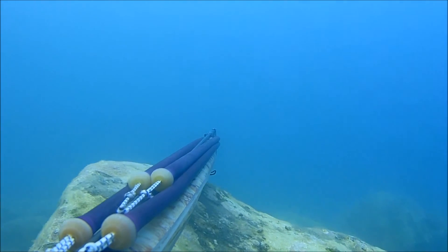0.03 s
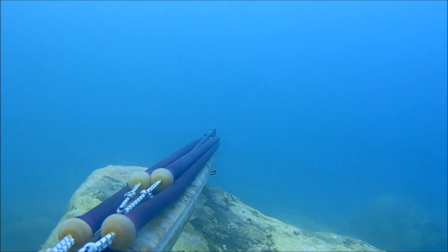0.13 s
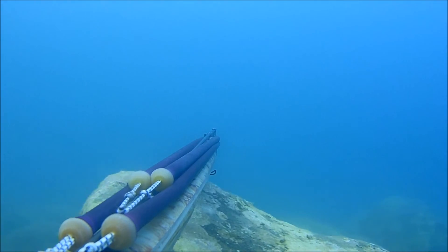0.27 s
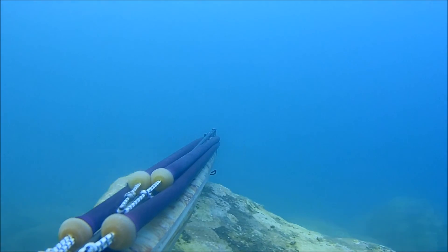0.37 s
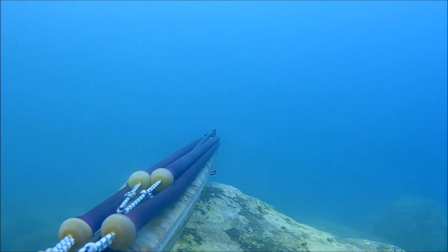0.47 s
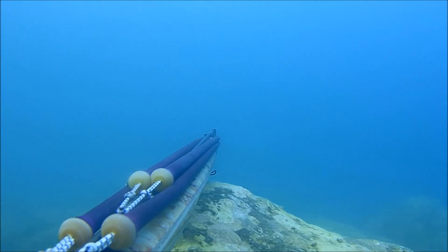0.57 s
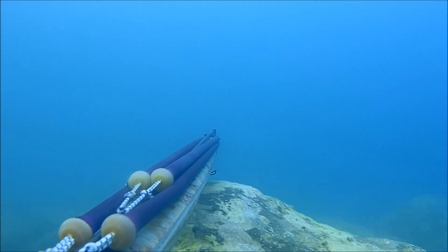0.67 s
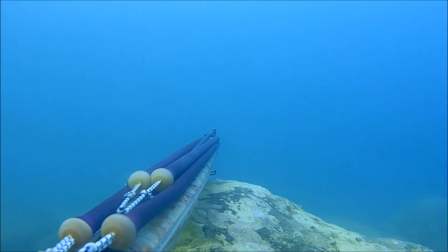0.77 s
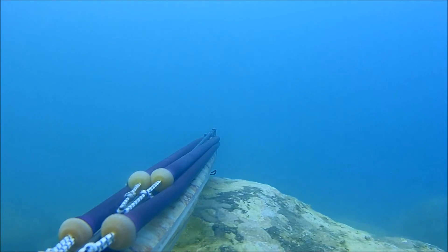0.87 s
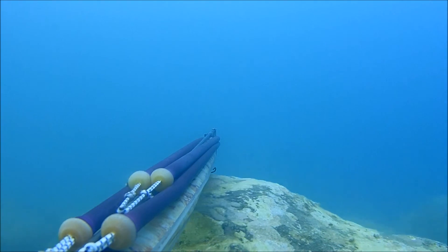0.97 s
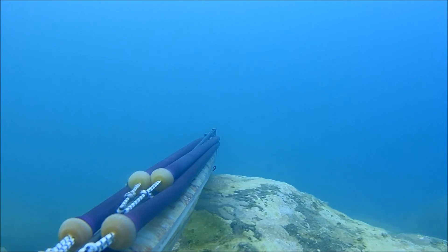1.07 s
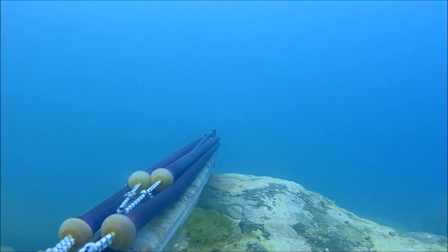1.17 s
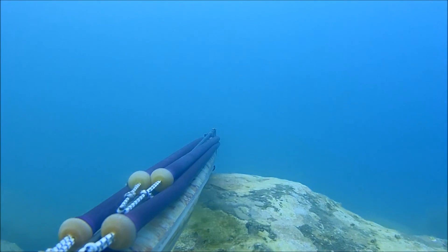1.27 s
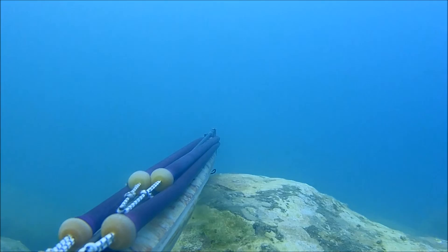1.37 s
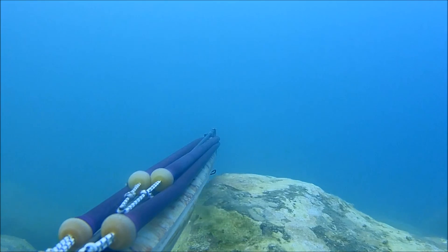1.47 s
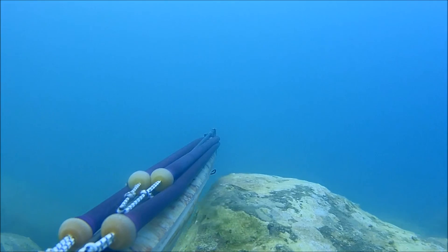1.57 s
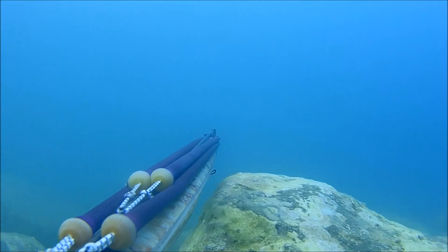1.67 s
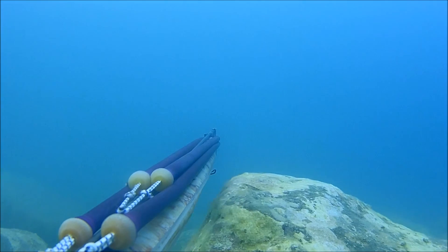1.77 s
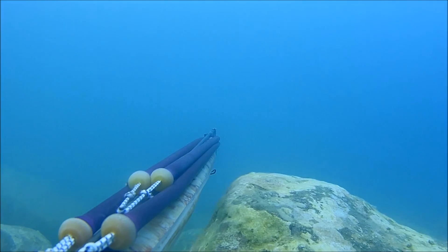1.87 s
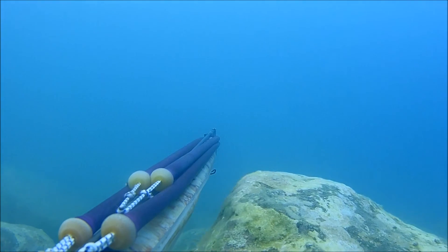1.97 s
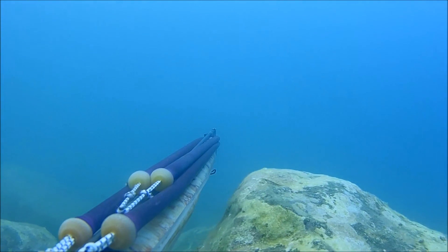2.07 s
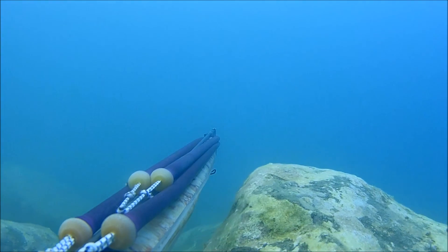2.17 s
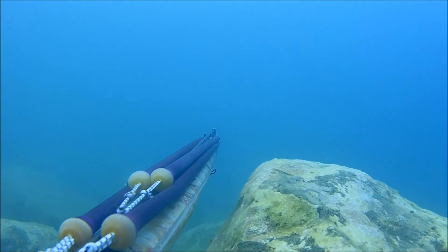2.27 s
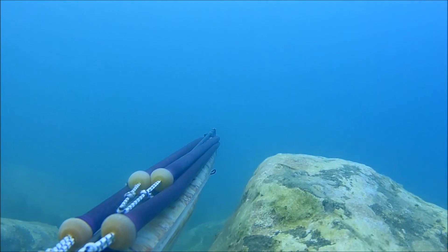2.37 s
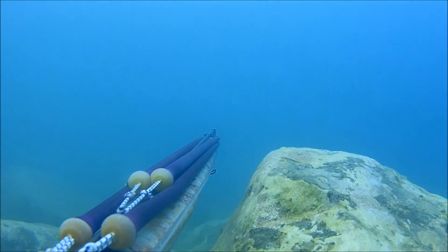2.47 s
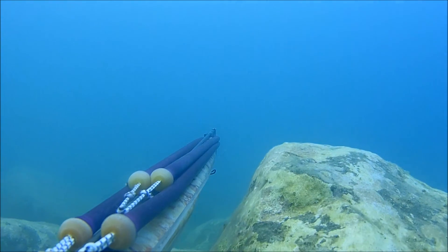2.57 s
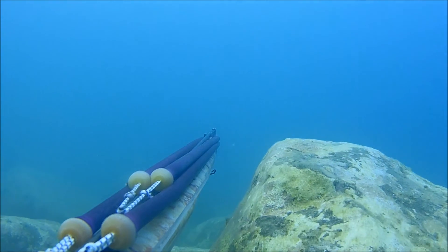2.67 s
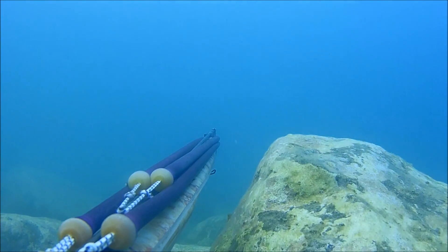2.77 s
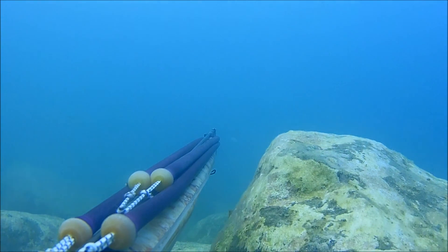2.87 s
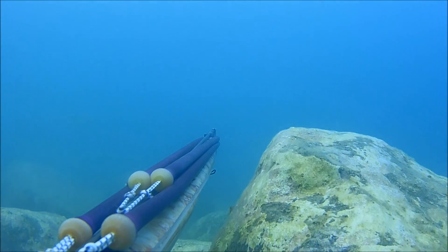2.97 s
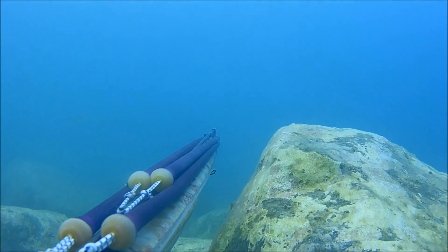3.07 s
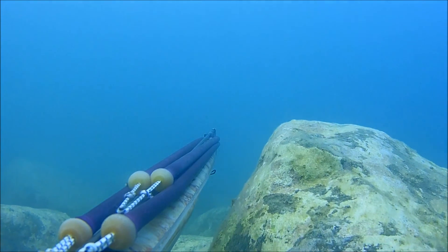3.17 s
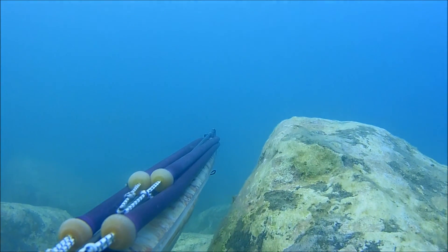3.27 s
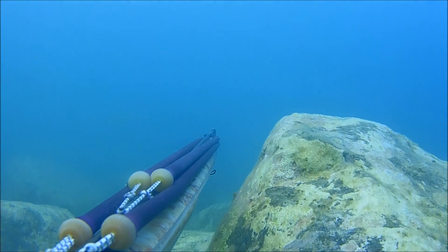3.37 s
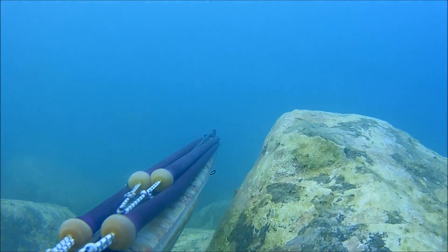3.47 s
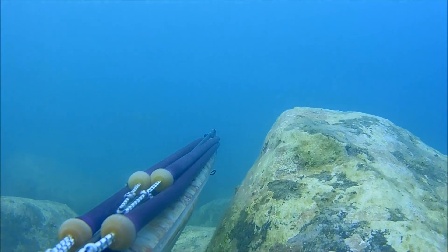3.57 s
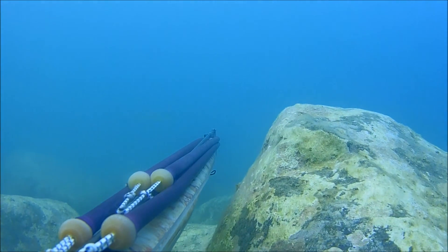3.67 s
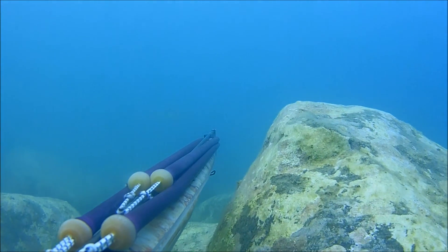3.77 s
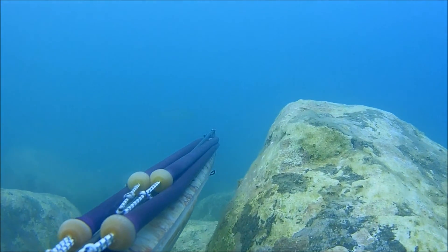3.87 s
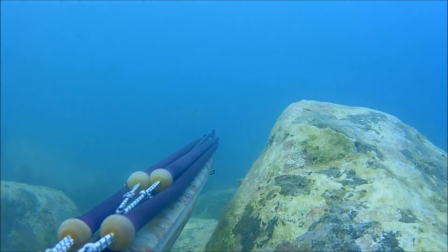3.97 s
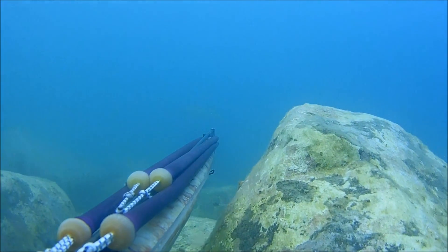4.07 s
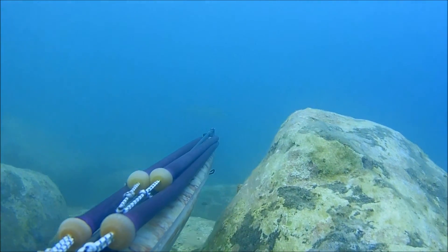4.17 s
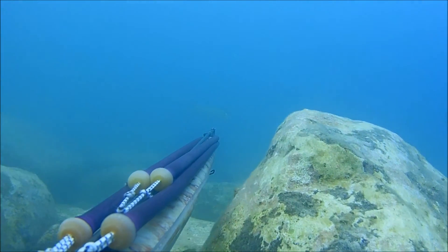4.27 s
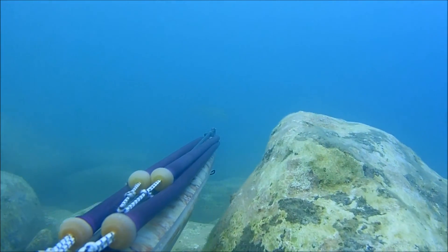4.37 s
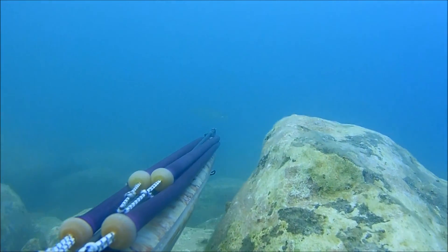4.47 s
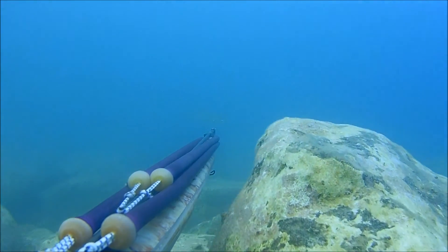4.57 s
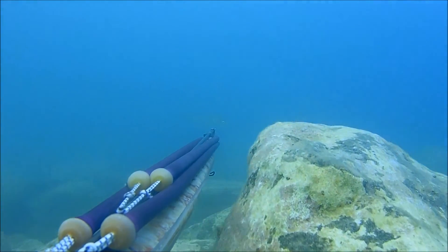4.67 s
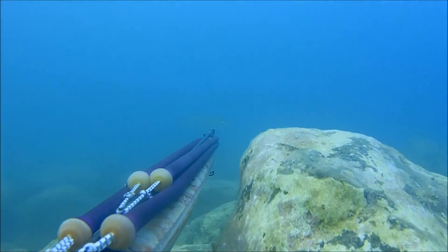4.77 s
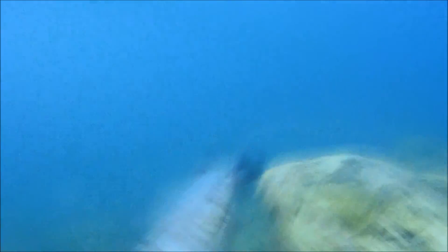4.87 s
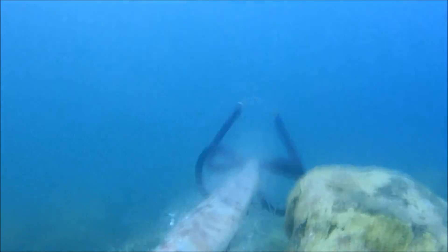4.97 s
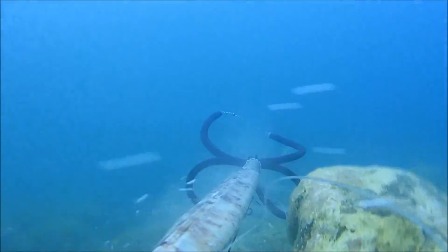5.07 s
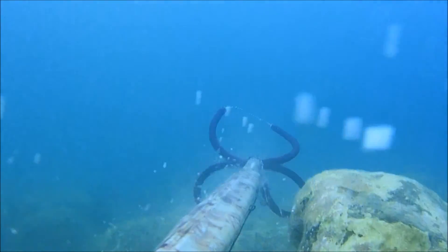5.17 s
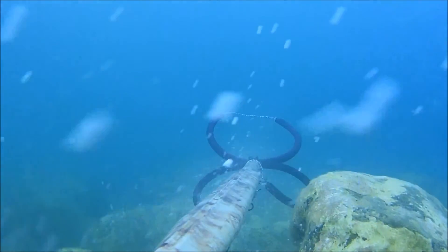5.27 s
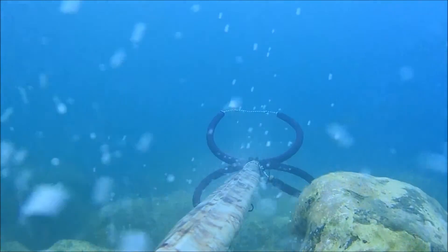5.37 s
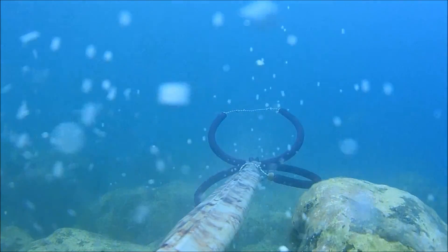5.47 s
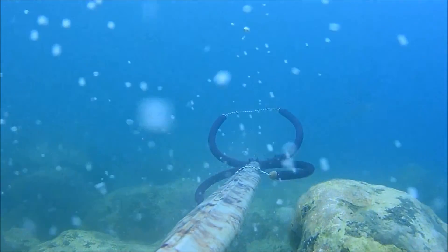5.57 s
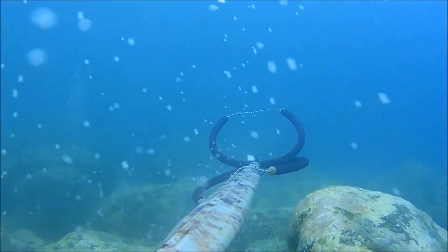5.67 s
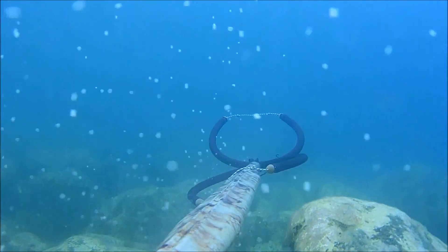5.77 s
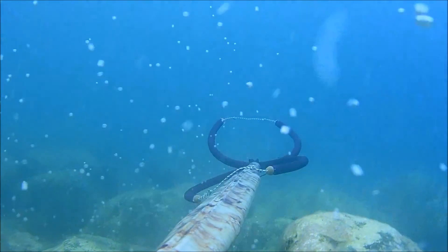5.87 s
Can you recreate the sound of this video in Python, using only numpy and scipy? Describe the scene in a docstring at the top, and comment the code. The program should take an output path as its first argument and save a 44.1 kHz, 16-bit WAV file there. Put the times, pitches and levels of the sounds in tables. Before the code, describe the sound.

The microphone is sealed in a housing on a speargun underwater, so handling sounds close, dull and hollow. For the first 3.5 seconds there is only a very faint, low-weighted hiss, tiny dry shrimp snaps with short rocky echoes, and a few barely audible taps. From about 3.6 seconds, soft rubbing and low rocking creep in; knocks strengthen after 4.4, with a firm woody double knock near 4.63 and low rumbling just before the shot. At 4.92-4.93 the gun fires: a very loud, overdriven battering of overlapping slams, bright at first, with deep recoil thumps, lasting until about 5.1. Strong slaps follow at 5.15 and 5.2, with a low swinging thud around 5.22-5.27. Bands, shaft and line then knock and rattle irregularly on the barrel at 5.4-5.65, with jerky wet rubbing and a sharper shrimp snap near 5.53. By 5.8 it thins to faint movement and hiss.

```python
"""Under water, a band-powered speargun is knocked and rubbed, then fires with a battering, overdriven burst.
Bands, shaft and line slap the barrel afterwards, over far shrimp crackle and a faint hiss.
The microphone sits in a housing fixed to the gun. Knocks and snaps are sums of fading sine waves;
the shot and the rubbing are noise ringing the same gun modes, with slow swings for recoil and sway."""
import sys
import numpy as np
from scipy import signal
from scipy.fft import rfft, irfft, next_fast_len
from scipy.io import wavfile
from scipy.ndimage import map_coordinates

SR = 44100
rng = np.random.default_rng(int(sys.argv[2]) if len(sys.argv) > 2 else 0)


def store_wav(level_fs):
    """Save 16-bit WAV to argv[1]."""
    pcm = np.round(np.clip(np.atleast_2d(level_fs), -1, 1) * 32767)
    wavfile.write(sys.argv[1], SR, pcm.T.astype(np.int16))


N = 261513  # length in samples

# Ways the gun rings. The damping in ring() later scales the fading.
# Columns: [f/Hz, level/dB, time to fade by 60 dB at damping 1/s]
STOCK_LOW_MODES = [(513, -3, 0.026), (629, -4.5, 0.043), (694.4, 0.5, 0.051), (816, -5, 0.03)]  # stock and housing
STOCK_HIGH_MODES = [(1042, -10.5, 0.031), (1429, -2.5, 0.03), (1621, 0, 0.016), (1768, -14.5, 0.027),
                    (2330, -21, 0.024), (3400, -22, 0.0089)]
STOCK_THUD_MODES = [(237, -8, 0.057), (386, 5, 0.029), (448, 1.5, 0.051)]
SHUDDER_HZ = 109.7


def amp(db):
    """Turn decibels into a plain multiplier."""
    return 10 ** (np.asarray(db) / 20)


def unit(x):
    """Scale a sound to an rms (average strength) of 1."""
    return x / np.sqrt(np.mean(x ** 2) + 1e-20)


def filtered(x, response):
    """Multiply the spectrum of x by a response that depends on frequency."""
    m = next_fast_len(N + SR // 2)  # spare room at the end
    spectrum = rfft(x, m) * response(np.fft.rfftfreq(m, 1 / SR))
    return irfft(spectrum, m)[:N]


def wobble(rate, size=N):
    """A smooth curve through random points, rate points a second."""
    points = rng.standard_normal(int(size * rate / SR) + 4)
    return map_coordinates(points, [np.arange(size) * rate / SR])


def ring(modes, scatter, attack, damping=0.86):
    """A struck body: a tenth of a second of fading sines, one row a mode; scatter in dB, attack in s."""
    t = np.arange(SR // 10) / SR
    hz, db, t60 = np.transpose(modes)[:, :, None]
    # each ring gets slightly random mode pitches and levels
    hz = hz * (1 + 0.0094 * scatter * rng.standard_normal(hz.shape))
    level = db + scatter * rng.standard_normal(db.shape)
    fading = amp(level - 60 * damping * t / t60)
    onset = (1 - np.exp(-t / attack)) ** 2
    return fading * np.sin(2 * np.pi * hz * t) * onset


def add(track, s, sound):
    """Mix a sound into the track at s seconds."""
    start = round(s * SR)
    track[start:start + len(sound)] += sound[:len(track) - start]


def shaken(modes, size=N):
    """Steady noise keeps the modes ringing, at rms 1."""
    noise = rng.standard_normal(size + SR // 10 - 1)
    return unit(signal.fftconvolve(noise, ring(modes, 0, 1e-4).sum(0), "valid"))


def held(length, t60):
    """An envelope that rises in 0.7 ms, holds until length seconds, then fades by 60 dB in t60 seconds."""
    t = np.arange(round(length * SR) + SR // 20) / SR
    return np.minimum(t / .0007, 1) * amp(-60 * np.maximum(t - length, 0) / t60)


def shot():
    """Shaft and bands batter the barrel; the strongest slams throw the gun back and it swings forward again."""
    # Slams: [t/s, length/s, low clatter level/dB, high clatter starting level/dB, recoil level/dB]
    # a recoil level near -30 dB means practically none: such a slam only clatters
    slams = [(4.918, 0.0068, -22, -43, -30), (4.932, 0.015, -1, 8, 5.5), (4.955, 0.0081, -39, -29, -30.5),
             (4.963, 0.029, -2.5, -1, 8.5), (4.972, .021, 4, -0.5, -32), (4.9936, .021, -4, -2.5, 9),
             (4.999, .009, 4.5, -6.5, -31.5), (5.02, .027, 2.5, -10, -7), (5.049, 0.026, -6.5, 0.5, -11),
             (5.062, 0.0029, -6, -5.5, -31.5), (5.078, 0.03, -21, -18.5, -12.5),
             (5.079, 0.013, -10.5, -20.5, -31), (5.113, 0.0044, -3.5, 2, -28),
             (5.204, 0.014, -7.5, -10, -28.5)]
    back_s, forward_share = .009, 0.8  # length of the backward push in s; forward strength beside it
    bright_fade_db = 11  # the high clatter loses this much over the slam's length
    low, high, shove = np.zeros((3, N))
    for s, length, low_db, high_db, recoil_db in slams:
        add(low, s, amp(low_db) * held(length, 0.014))
        bright = held(length, 0.015)
        fade_db = bright_fade_db * np.arange(len(bright)) / SR / length
        add(high, s, amp(high_db - fade_db) * bright)
        recoil = amp(recoil_db)
        add(shove, s, -recoil * held(back_s, .007))
        add(shove, s + back_s, forward_share * recoil * held(max(length - back_s, 0), .007))
    # a broad scrape, strongest near 1800 Hz
    scrape = unit(filtered(rng.standard_normal(N), lambda hz: hz / (1 + (hz / 1800) ** 2)))
    shudder = shaken([(SHUDDER_HZ, 0, .09)])
    low_clatter = shaken(STOCK_LOW_MODES) + 0.28 * shaken(STOCK_THUD_MODES) + 0.39 * shudder
    high_clatter = shaken(STOCK_HIGH_MODES) + 0.095 * scrape
    return low * low_clatter + high * high_clatter + shove


def knocks():
    """Each blow has its own favoured low mode and brightness; harder or lower blows thud more."""
    # Blows: [t/s, peak level of the low modes/dB, favoured f/Hz, upper part against the low modes/dB]
    # where a blow lands decides its favoured mode and brightness
    blows = [(1.263, -43.5, 875, 2.5), (2.026, -47, 710, 12), (2.883, -44.5, 697, -14),
             (3.527, -39, 692, -17), (3.969, -30.5, 824, -14), (4.223, -40.5, 810, 2),
             (4.291, -38.5, 684, -20), (4.319, -41, 700, -8), (4.479, -24, 580, -16), (4.6, -27.5, 595, -7),
             (4.632, -10.5, 830, -7), (4.642, -21, 840, -23), (4.676, -18.5, 693, -4.5),
             (4.713, -30, 620, -30), (4.786, -25.5, 640, -32), (4.837, -30, 708, -6),
             (4.893, -30.5, 666, 3), (5.125, -16, 760, 11), (5.151, -4, 666, -4), (5.155, -7.5, 686, -6.5),
             (5.223, -13, 640, -6), (5.257, -15, 822, 7), (5.267, -12, 680, 8), (5.287, -17.5, 726, 1.5),
             (5.316, -32, 681, -12), (5.351, -32, 666, 12), (5.406, -18, 700, 4), (5.439, -11, 705, -8.5),
             (5.474, -23.5, 710, -0.5), (5.499, -23.5, 686, 3), (5.511, -20.5, 634, -4),
             (5.542, -13.5, 750, -3), (5.576, -21, 690, -17), (5.653, -22.5, 719, -10),
             (5.768, -41, 446, 2)]
    hand_damping = 1.1  # above 1, the modes fade faster than in their tables
    thud_db, thud_grows = -46.5, 0.74  # thud of a -34 dB blow at 700 Hz; dB gained per dB of blow
    thud_db_per_octave = 21.5  # blows that favour lower modes thud more
    track, mode_hz = np.zeros(N), np.array(STOCK_LOW_MODES)[:, :1]
    # the first contact is a short burst of noise
    crack = amp(-38.5 - 60 * np.arange(SR // 10) / SR / 0.0039)
    for s, db, hz, upper_db in blows:
        favour = amp(-40 * np.abs(np.log2(mode_hz / hz)))  # 40 dB weaker per octave away
        low = (favour * ring(STOCK_LOW_MODES, 1.76, 0.00045, hand_damping)).sum(0)
        low = low / np.abs(low).max()
        upper = ring(STOCK_HIGH_MODES, 2.96, 0.00089, hand_damping).sum(0)
        upper = upper + crack * rng.standard_normal(len(crack))
        thud_level = thud_db + thud_grows * (db + 34) + thud_db_per_octave * np.log2(700 / hz)
        thud = amp(thud_level) * ring(STOCK_THUD_MODES, 4.3, 0.0011, hand_damping).sum(0)
        add(track, s, amp(db) * (low + amp(upper_db) * upper) + thud)
    return track


def motion(rows, upper_db):
    """The gun rocks in the hand at an uneven pace while wet rubber and line rub the barrel in jerks."""
    sway_hz = 37.6  # average rocking pace
    s, *columns = np.transpose(rows)
    t = np.arange(s[0], s[-1], 1 / SR)
    n, track = len(t), np.zeros(N)
    sway_db, shudder_db, rub_db = [np.interp(t, s, column) for column in columns]
    pace = sway_hz * (1 + 0.27 * wobble(15, n))
    rocking = np.sqrt(2) * np.sin(2 * np.pi * np.cumsum(pace) / SR)
    sway = amp(sway_db) * amp(1.5 * wobble(10, n)) * rocking
    shudder = amp(shudder_db) * shaken([(SHUDDER_HZ, 0, .09), (170, -9, .05), (75, -3, .09)], n)
    jerks = unit(amp(4.9 * wobble(89.5, n)))
    # light rubbing keeps the strongest mode singing
    singing = 1.5 * shaken([(705.0, 0, 0.052)], n)
    hum = unit(shaken(STOCK_LOW_MODES + STOCK_THUD_MODES, n) + singing)
    rubbing = jerks * (hum + amp(upper_db) * shaken(STOCK_HIGH_MODES, n))
    ends = np.clip(np.minimum(t - s[0], s[-1] - t) / .008, 0, 1)  # 8 ms fades in and out
    add(track, s[0], ends * (sway + shudder + amp(rub_db) * rubbing))
    return track


def shrimp():
    """Each snap rings the housing window and comes back scattered off the rocks; faint ones fall at random."""
    # Snaps: [t/s, level/dB, level of the middle window modes/dB]
    snaps = [(0.0343, -51, -8), (0.1037, -53.5, -1), (0.2244, -43, 1.5), (0.342, -53, -5),
             (1.0966, -40, -3), (1.3289, -53, -4), (1.475, -43.5, -9.5), (1.6588, -47.5, -9),
             (1.879, -44, -2.5), (2.3156, -51, -1), (2.5592, -36, 2), (2.8554, -56, 4), (3.1742, -47, -3),
             (3.6204, -51.5, 4), (4.2243, -42.5, 4), (4.7277, -53.5, 3.5), (5.242, -43, -1),
             (5.4655, -43.5, -4), (5.5345, -30.5, -8), (5.677, -42.5, -7)]
    # How the housing window rings: [f/Hz, level/dB, time to fade by 60 dB at damping 1/s]
    window_low = [(2290, -1.5, 0.012), (2413, -2.5, 0.019), (2980, -7, 0.014)]
    window_middle = [(3300, -21, .01), (3723, -4, 0.021), (4590, -6, .015), (4840, -12, 0.012),
                     (5520, -13.5, 0.0082)]
    window_treble = [(8300, 2, .008), (9540, 4, 0.0087), (11600, 2.5, 0.014)]
    treble_db, treble_grows = -63, 0.46  # treble of a -44 dB snap; dB gained per dB of snap
    # 30 faint snaps: any time, level from -56.5 to -53.5 dB, middle modes from -10 to -2 dB
    faint = rng.random(size=(30, 3)) * [N / SR, 3, 8] + [0, -56.5, -10]
    direct = np.zeros(N)
    for s, db, middle_db in np.vstack([snaps, faint]):
        body = ring(window_low, 2.4, 0.00041).sum(0)
        body = body + amp(middle_db) * ring(window_middle, 2.7, 0.00017).sum(0)
        treble_level = treble_db + treble_grows * (db + 44)
        treble = amp(treble_level) * ring(window_treble, 3.1, .0001).sum(0)
        add(direct, s, amp(db) * body + treble)
    t = np.arange(SR // 10) / SR
    # the echo is fading noise that starts after 3 ms
    rocks = rng.standard_normal(len(t)) * amp(-60 * t / 0.088) * (t > .003)
    echo = signal.oaconvolve(direct, rocks / np.linalg.norm(rocks))[:N]
    return direct + amp(-7.5) * echo


def hiss():
    """Water and microphone make a noise with a fixed tone colour and a slightly wavering level."""
    # Tone colour of the hiss, before its loudness is set: [f/Hz, relative level/dB]
    colour = [(12, -30), (20, -1), (58, -5), (91, -4), (135, -2.5), (169, -2.5), (289, -3), (506, -7),
              (750, -10), (1430, -16.5), (1790, -20), (15200, -38), (16500, -42)]
    f, db = np.transpose(colour)
    noise = filtered(rng.standard_normal(N), lambda hz: amp(np.interp(np.log(hz + 1), np.log(f), db)))
    return amp(-53.5 + 0.7 * wobble(6.9)) * unit(noise)


def scene():
    """All the sounds add up at the one microphone."""
    # The moving gun before and after the shot: [t/s, sway level/dB, shudder level/dB, rubbing level/dB]
    aiming = [(3.6, -65, -79, -69), (3.86, -69, -74, -67), (3.986, -52.5, -54, -58), (4.068, -61, -66, -76),
              (4.148, -53, -58, -54.5), (4.426, -58.5, -58.5, -61), (4.5, -48.5, -47, -52),
              (4.58, -56, -58.5, -63), (4.64, -40, -49, -52), (4.71, -47, -46.5, -50.5),
              (4.79, -34.5, -48, -50.5), (4.87, -40, -50, -43.5), (4.915, -34, -29, -35)]
    settling = [(5.13, -37, -40, -33), (5.18, -30, -37, -30.5), (5.222, -17, -23, -26),
                (5.262, -16.5, -32, -26), (5.346, -32.5, -36.5, -36.5), (5.434, -42.5, -41.5, -42.5),
                (5.516, -23.5, -28, -28.5), (5.562, -38, -40.5, -42), (5.638, -28, -32, -44),
                (5.706, -41, -49, -51.5), (5.816, -48.5, -53.5, -54), (5.93, -54, -60, -57.5)]
    # upper modes against the rubbing hum, in dB: bands drawn, then bands loose
    gun = motion(aiming, -15.5) + motion(settling, -9)
    return (shot() + knocks() + gun + shrimp() + hiss())[None]


def record(dry):
    """The microphone stage clips hard, leaks a little overdrive and cuts the deepest and highest sounds."""
    clip_level, clip_knee, clip_leak = .47, 10, .02  # ceiling; sharpness of its bend; share let through
    sag_hz, top_hz = 2, 16500  # slow swings sag back to zero below about 2 Hz; nothing above top_hz
    sound = dry[0]
    clipped = sound / (1 + np.abs(sound / clip_level) ** clip_knee) ** (1 / clip_knee)
    overdriven = clipped + clip_leak * sound
    return filtered(overdriven, lambda hz: 1j * hz / (sag_hz + 1j * hz) * (hz < top_hz))[None]


dry = scene()
out = record(dry)
store_wav(out)
```